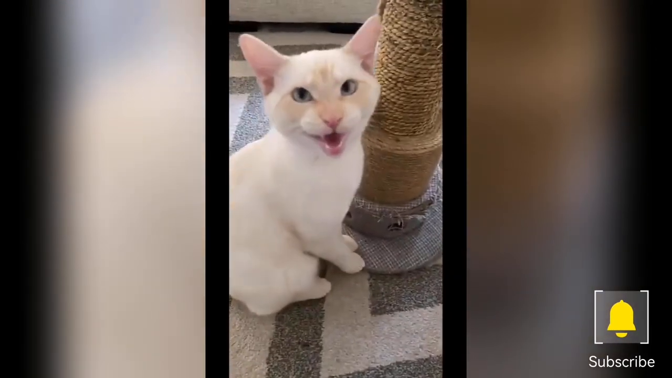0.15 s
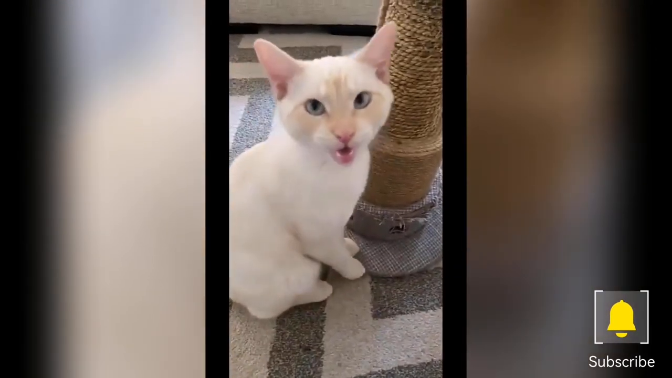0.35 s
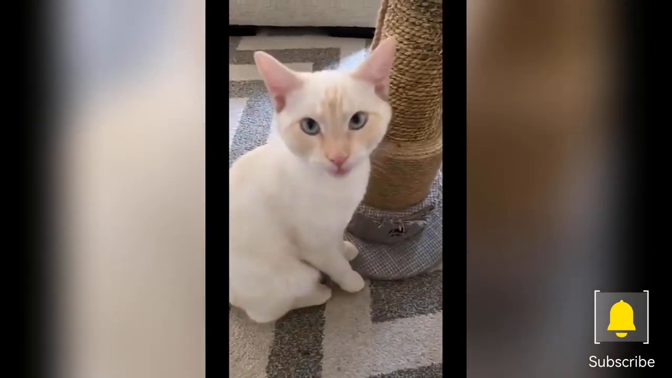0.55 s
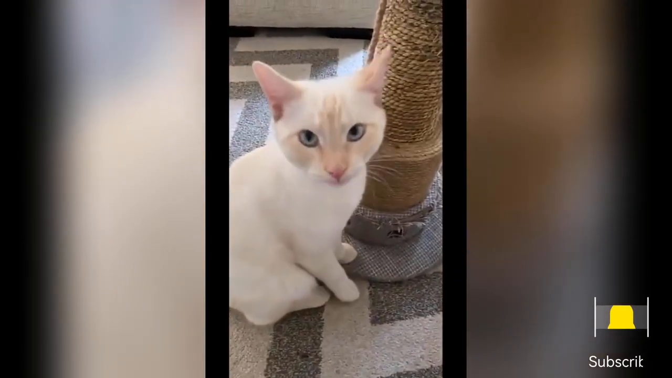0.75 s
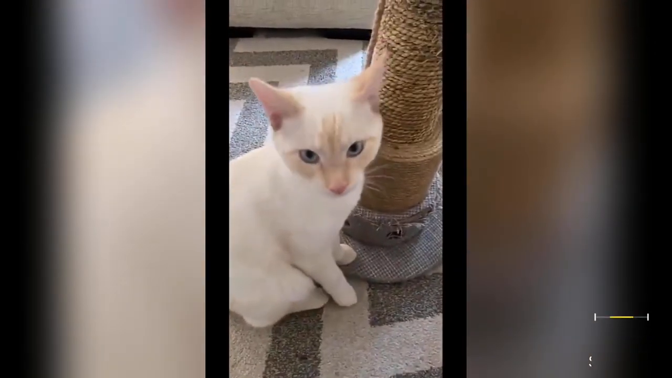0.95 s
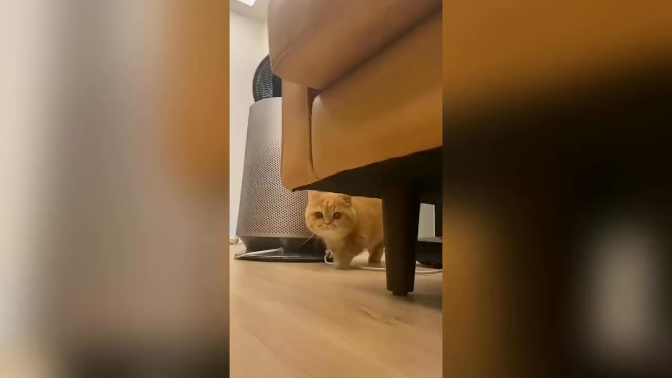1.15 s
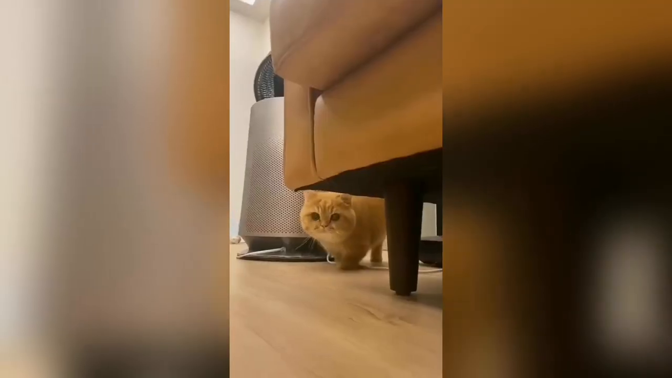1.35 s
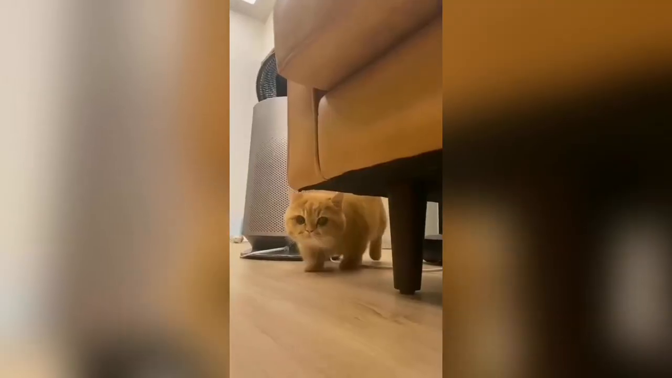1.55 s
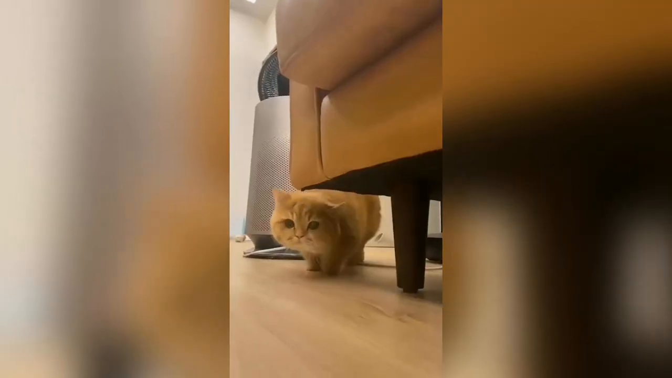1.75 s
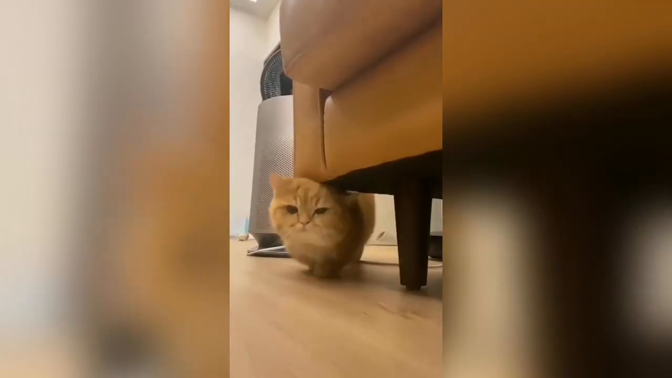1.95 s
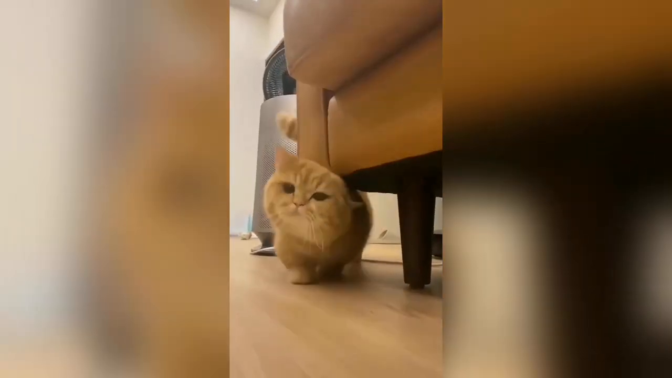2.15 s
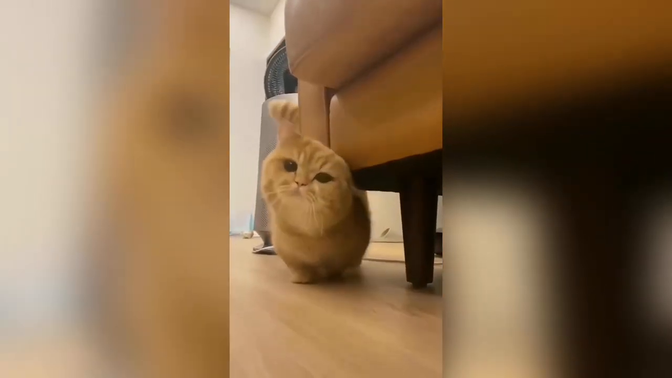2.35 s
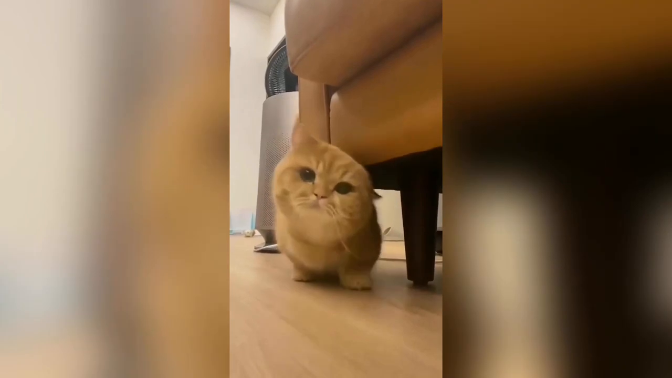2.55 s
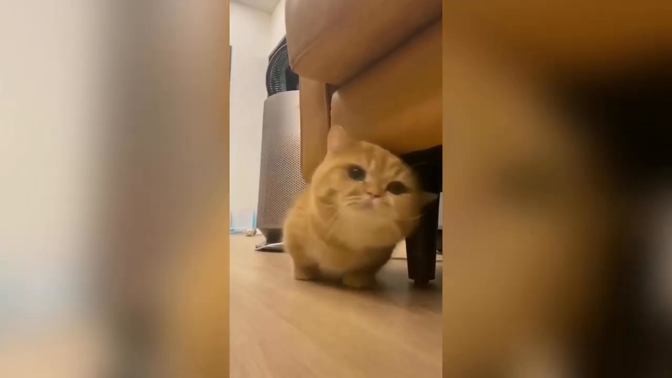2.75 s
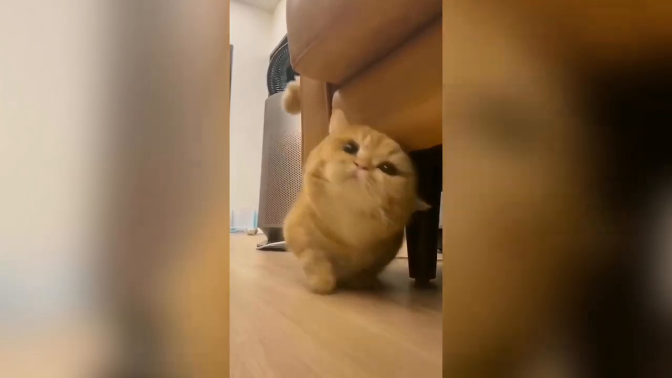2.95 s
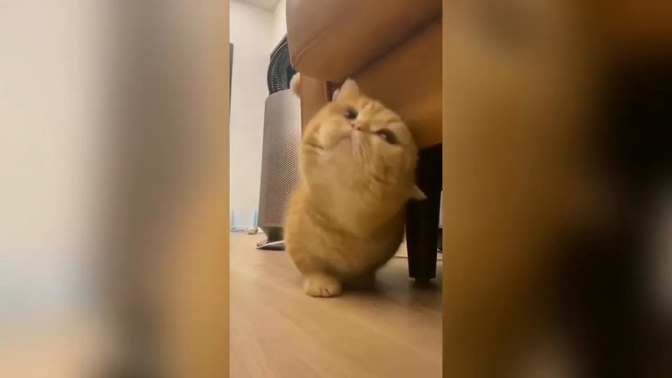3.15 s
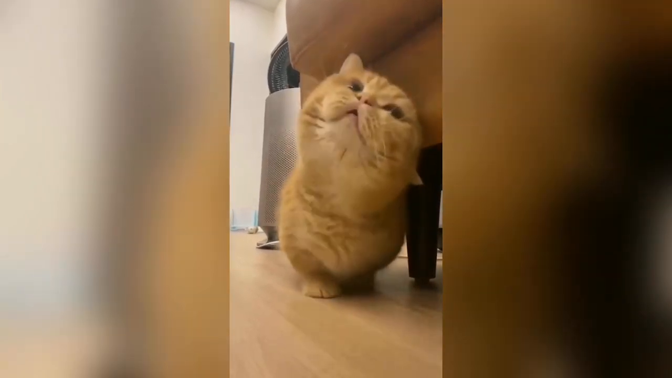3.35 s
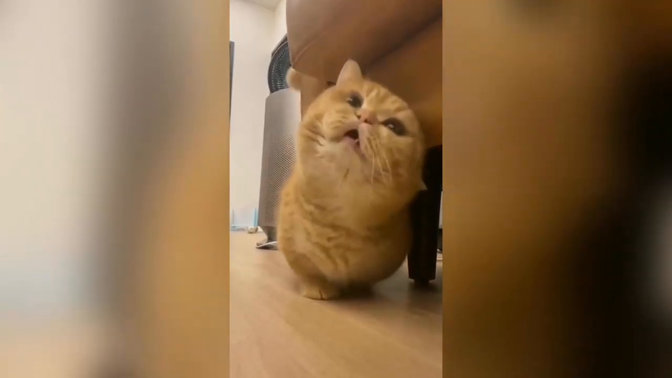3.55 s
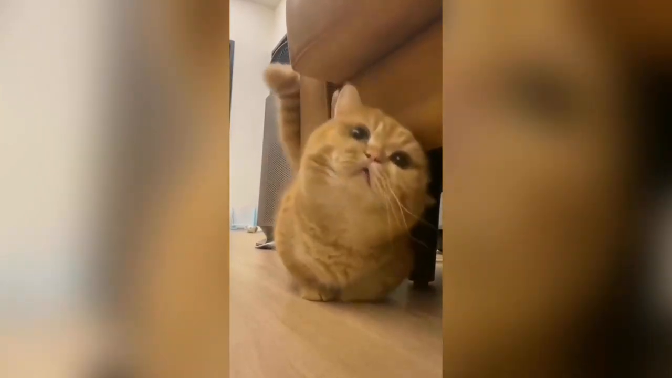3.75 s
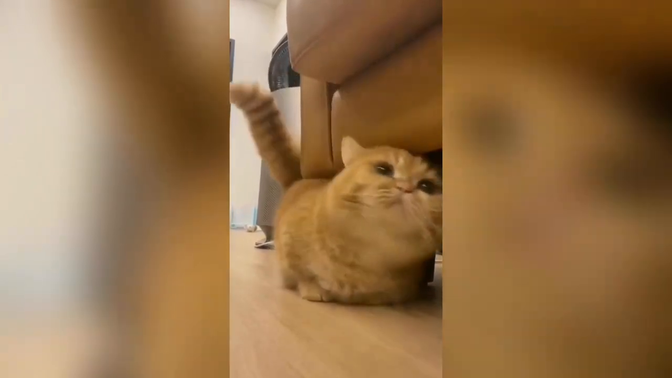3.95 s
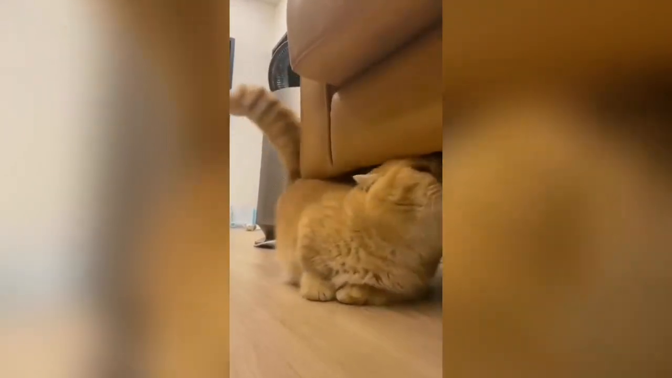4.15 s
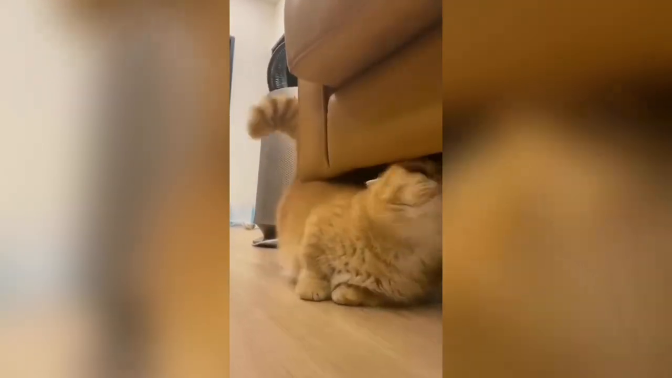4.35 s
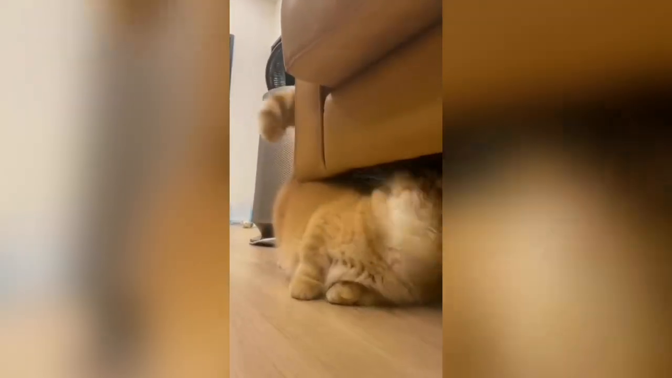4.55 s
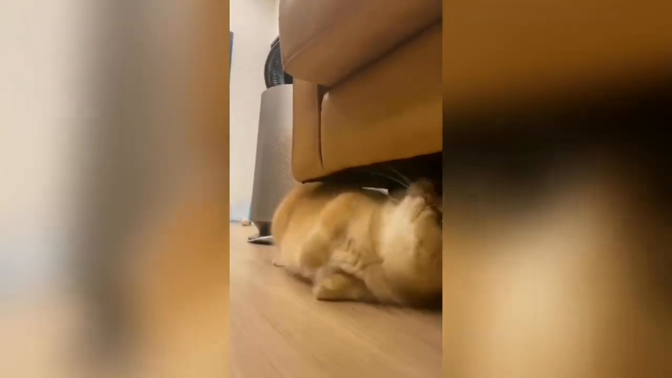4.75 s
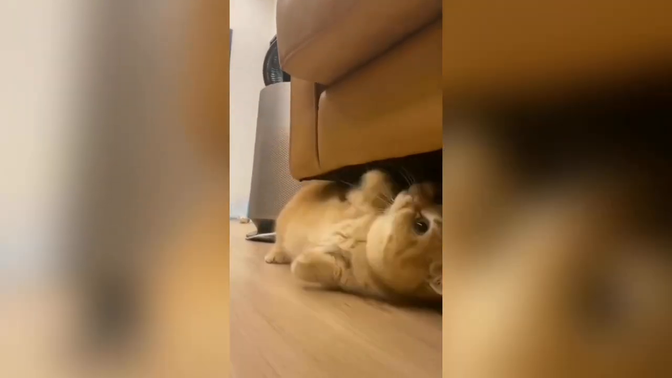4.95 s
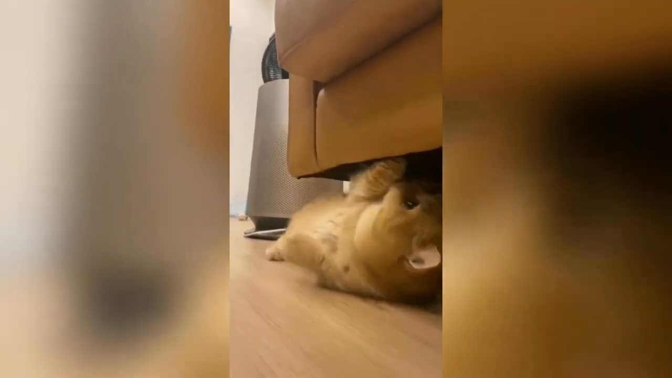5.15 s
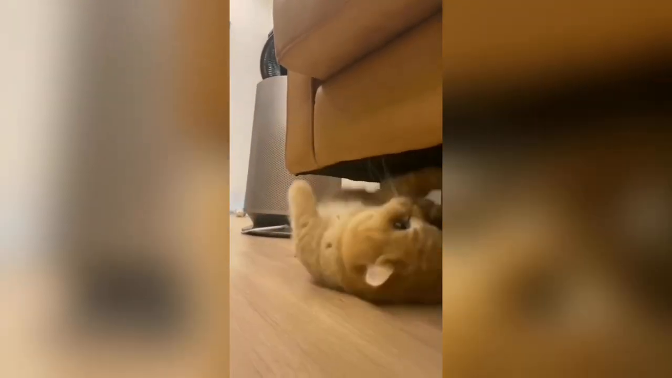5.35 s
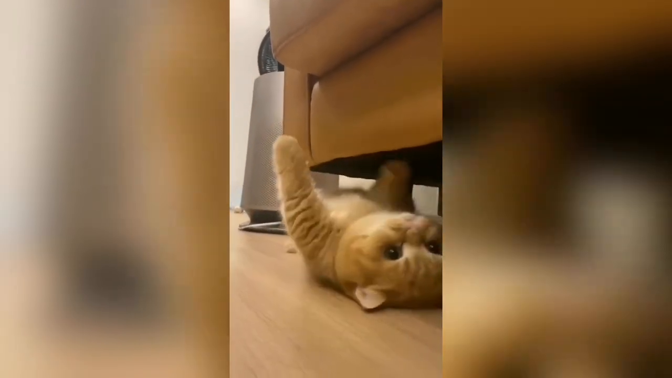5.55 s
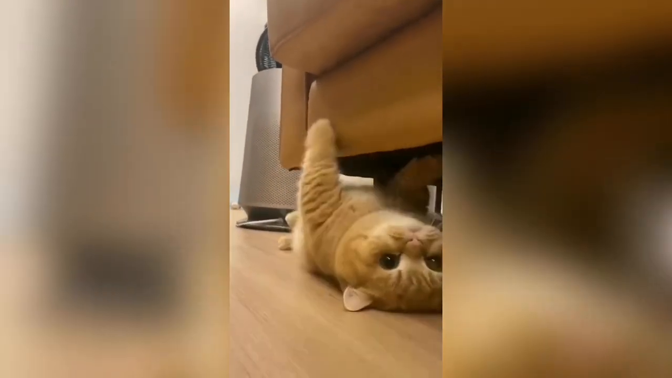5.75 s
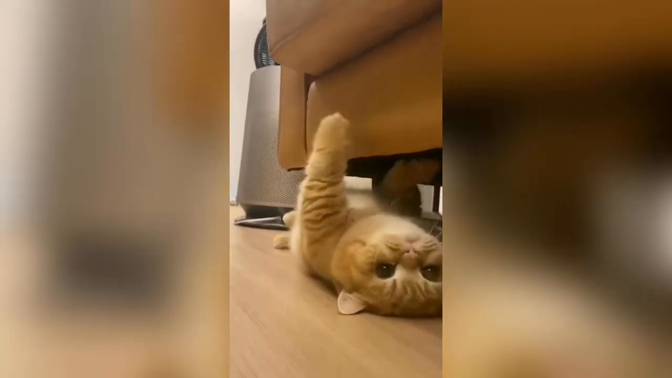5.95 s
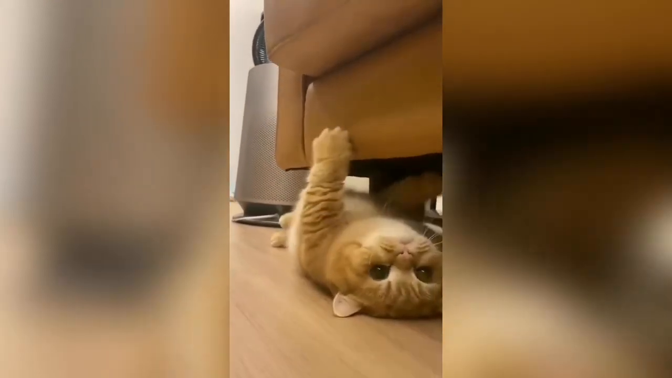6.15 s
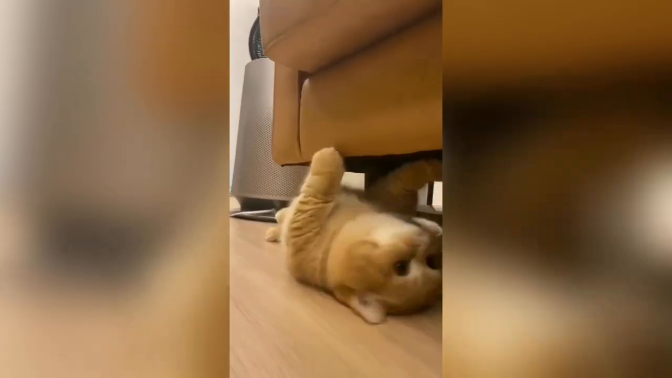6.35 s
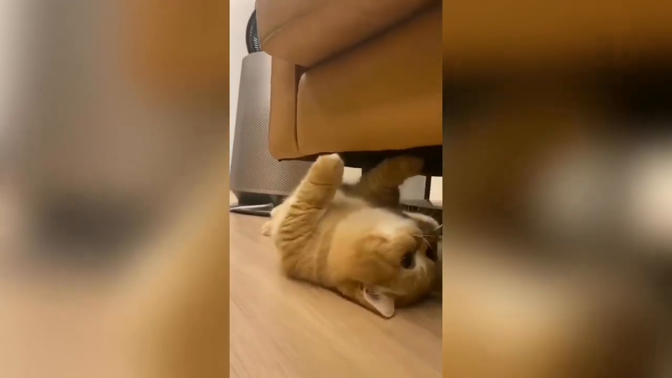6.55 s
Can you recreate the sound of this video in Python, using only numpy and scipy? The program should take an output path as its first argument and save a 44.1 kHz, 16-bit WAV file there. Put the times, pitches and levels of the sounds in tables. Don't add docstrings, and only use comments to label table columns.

```python
import sys
import numpy as np
from scipy import signal
from scipy.fft import rfft, irfft
from scipy.io import wavfile
from scipy.ndimage import uniform_filter1d

SR = 44100
rng = np.random.default_rng(int(sys.argv[2]) if len(sys.argv) > 2 else 0)


def output_pcm(signal):
    pcm = np.clip(np.atleast_2d(signal).T, -1, 1) * 32767
    wavfile.write(sys.argv[1], SR, np.round(pcm).astype(np.int16))


def gain_from_db(level_db):
    decades = np.asarray(level_db, float) / 20
    return 10 ** decades


N = 291060
T = np.arange(N) / SR
TOP_HZ = 13150
CUT_START_S, CUT_END_S = 1.207, 1.46

# f/Hz, density/dB per Hz
AIR_1_SPECTRUM = [(15, -37), (25, -25), (59, 3.5), (90, -19), (123, -2), (214, -31.5), (293, -15),
                  (380, -37), (411, -16.5), (534, -42), (1370, -44.5), (1830, -54.5), (13000, -58.5)]
AIR_2_SPECTRUM = [(15, -48), (25, -24), (37, -3.5), (64, 0.5), (120, -4), (148, -5), (173, -10.5),
                  (333, -10), (494, -24), (641, -22), (712, -24), (1110, -41.5), (4810, -56.5),
                  (7500, -53.5), (13000, -62)]
# f/Hz, width/Hz, level/dB
FAN_TONES = [
    (74, 15, -54.5),
    (110.6, 10, -58.5),
    (139.6, 5.6, -59.5),
]
# t/s, length/s, low swish/dB, high swish/dB re low, crisp top/dB re low
FUR_STROKES = [(1.505, 0.13, -98, -17, -16), (1.806, 0.13, -102, -13, -33), (2.156, 0.11, -80.5, -1, -27),
               (2.297, .12, -81.5, -3.5, -4.5), (2.402, 0.14, -75.5, -4, -27), (2.814, 0.055, -87, -2, -40),
               (3.083, 0.29, -75, -6, -8), (3.44, 0.6, -74.5, -3.5, -14), (3.977, 0.27, -68, -8, -13.5),
               (4.294, 0.44, -86, 11.5, -14), (4.7, 0.077, -92, 5, -3), (4.93, 0.12, -80, -3, 3),
               (5.073, 0.092, -71, -5, 0.5), (5.262, .12, -72, -5.5, -40), (5.389, .13, -60.5, -2.5, 1.5),
               (5.703, 0.14, -66, -2.5, -39), (5.789, 0.034, -86, 6, -32), (5.996, 0.11, -83, 10, -24),
               (6.055, 0.11, -61, -5.5, -21.5), (6.15, 0.28, -81, 4.5, -26), (6.393, 0.117, -60, -12, -35),
               (6.484, .3, -60.5, -38, -52)]
# low edge/Hz, high edge/Hz
TAP_BANDS_HZ = [
    (200, 800),
    (600, 2430),
    (2200, 4940),
    (6500, 8600),
]
# t/s, peak level/dB, thud/dB, body/dB
CLAW_TAPS = [
    (1.078, -67, 8, -16),
    (4.723, -60.5, -17, -14),
    (4.934, -66, -14, -3),
    (5.092, -64, 4, -2),
    (5.205, -57, -11, -1),
    (5.397, -41, -14, -5),
    (5.42, -50.5, 12, -1),
    (5.5, -50.5, -3, -2),
]
# t/s, peak level/dB, thud/dB, body/dB
PAD_TAPS = [(2.096, -76, 16, -18), (3.338, -68, 8.5, -8), (4.578, -68, 2, -13), (5.016, -67, 10, -10),
            (5.719, -70, 29.5, -5), (5.739, -58, 24.5, 2), (5.764, -54.5, 14, -11), (5.788, -57.5, 17.5, 3),
            (5.821, -61, 11, -13), (6.03, -52.5, 10.5, -4), (6.056, -39.5, 10, 9), (6.086, -50, 10, -12),
            (6.191, -57, 19.5, -13), (6.411, -41.5, 7, 5), (6.428, -43, -12, -2), (6.54, -55, -13, -12)]
# t/s, pitch/Hz, level/dB
MEW_TRACK = [
    (3.55, 847, -67.5),
    (3.589, 857, -45.5),
    (3.665, 976, -37.5),
    (3.731, 1107, -40.5),
    (3.78, 1139, -37.5),
    (3.851, 1159, -40),
    (3.909, 1132, -40.5),
    (3.991, 1020, -37.5),
    (4.066, 891, -48.5),
]
# t/s, pitch/Hz, level/dB, mouth resonance/Hz
MEOW_TRACK = [
    (0.0, 1111, -41, 2190),
    (0.05, 1055, -42, 2130),
    (0.064, 810, -46, 2400),
    (0.084, 896, -45.5, 2496),
    (0.2, 855.4, -42.5, 2346),
    (0.3, 817, -43, 2174),
    (0.42, 770, -47.5, 1782),
    (0.65, 741.5, -48, 1706),
    (0.715, 704, -53.5, 1163),
]
# t/s, pitch/Hz, level/dB, mouth resonance/Hz
CATCH_TRACK = [
    (0.791, 705, -63, 1350),
    (0.806, 812, -54.5, 1163),
    (0.86, 867.5, -92, 2650),
]
# f/Hz, level/dB
MEW_UPPER_COLOUR = [(3400, 16), (4500, -5.5), (5700, -3.5), (6900, -14), (7500, -49.5), (9500, -31.5),
                    (12500, -38)]
MEOW_UPPER_COLOUR = [(2700, -18), (3400, -12), (4300, -11.5), (5300, -13), (6300, 4.5), (6950, 4.5),
                     (7300, -24), (7800, -9.5), (8800, -16), (9800, -19), (10500, -32), (11500, -27),
                     (13000, -27)]
# f/Hz, level/dB
MEW_SIDE_COLOUR = [(60, -36.5), (110, -36), (200, -19.5), (360, -12), (650, -4), (1170, -21.5), (2120, -15),
                   (3840, -16.5), (6970, 11.5), (12600, -3)]
MEOW_SIDE_COLOUR = [(600, -10.5), (1200, -12), (2400, -11.5), (3000, 10.5), (4600, 7), (5600, -0.5),
                    (7000, -13), (12000, -11)]
# f/Hz, level/dB
AUDIBLE_FLOOR = [(900, -125), (3000, -112), (6000, -106), (6800, -98), (9300, -98), (9900, -115),
                 (13000, -115)]
# f/Hz, level/dB
MASKING_DEPTH = [(700, -39), (1900, -37.5), (3500, -28), (6900, -30.5), (7300, -12.5), (7800, -29),
                 (9600, -26.5), (10300, -12), (11300, -19), (13000, -23.5)]


def colour(points, hz):
    f, db = np.transpose(points)
    return np.interp(np.log(np.maximum(hz, 1)), np.log(f), db)


def band(lo_hz, hi_hz, channels=1, order=2):
    sos = signal.butter(order, [lo_hz, min(hi_hz, .45 * SR)], "band", fs=SR, output="sos")
    x = signal.sosfilt(sos, rng.standard_normal((channels, N)))
    return x / x.std()


def walk(rate_hz):
    hold = max(int(SR / rate_hz), 1)
    x = np.repeat(rng.standard_normal(N // hold + 1), hold)
    x = uniform_filter1d(uniform_filter1d(x, hold), hold)[:N]
    return x / x.std()


def air(points, level_db, alike_hz, swell_db, flicker_db):
    out, swell = 0, walk(1.4)
    for hz in 28 * 2 ** np.arange(0, 9.1, .5):
        mid, side = band(hz * 2 ** -.25, hz * 2 ** .25, channels=2)
        db = colour(points, hz) + 10 * np.log10(hz)
        db = db + swell_db * swell + flicker_db * min(hz / 400, 1) * walk(9)
        width = min((hz / alike_hz) ** 1.5, 1)
        out = out + gain_from_db(db) * (mid + width * side * np.array([[1], [-1]]))
    return out * gain_from_db(level_db) / out.std()


def fan():
    return sum(gain_from_db(db) * band(hz - width / 2, hz + width / 2)[0] for hz, width, db in FAN_TONES)


def fur(grain_db, patch_db, wide, top_db):
    press_share, fade_db = .2, 15
    s, length, db, high_db, crisp_db = np.transpose(FUR_STROKES)[:, :, None]
    along = (T[::64] - s) / length
    stroke = np.clip(along / press_share, 0, 1) * gain_from_db(-fade_db * np.clip(along - press_share, 0, 9))

    def strength(rel_db, rest_db):
        coarse = (stroke * gain_from_db(db + rel_db)).sum(axis=0) + gain_from_db(rest_db)
        return np.repeat(coarse, 64)[:N]

    low, high, crisp = strength(0, -92), strength(high_db, -97), strength(crisp_db, -115)
    top = np.maximum(high * gain_from_db(-4.0), crisp) * gain_from_db(top_db)
    edges_hz = (1000, 2660), (2800, 5540), (6800, 8800), (9600, 12000)
    out = 0
    for edge, gain in zip(edges_hz, (low, high, crisp, top)):
        noise = band(*edge, channels=3, order=4)
        out = out + gain * gain_from_db(patch_db * walk(30)) * (noise[0] + wide * noise[1:])
    return gain_from_db(grain_db * walk(150) - 5.0) * out


def taps(cycles, crack_db, tail_db, wide):
    # crisp dB, tail s, left minus right dB
    claw_kind, pad_kind = (-3, .14, 2), (-28, 0.16, -0.17)
    blows = [(*row, *claw_kind) for row in CLAW_TAPS] + [(*row, *pad_kind) for row in PAD_TAPS]
    bands = [band(*edge, channels=3, order=4) for edge in TAP_BANDS_HZ]
    out, grain = np.zeros((2, N)), gain_from_db(2 * walk(200))
    place = rng.uniform(0.2, .6, (len(blows), 4))
    for (s, db, thud_db, body_db, crisp_db, tail_s, pan_db), where in zip(blows, place):
        i = slice(int(s * SR), min(int((s + .5) * SR), N))
        t = T[i] - T[i][0]
        decay = 1000 ** (-t / max(tail_s, .01))
        tail = gain_from_db(tail_db) * decay * (1 - np.exp(-t / 0.0016)) * grain[i]
        pan = np.array([[pan_db], [-pan_db]]) / 2
        levels_db = thud_db, body_db, -4, crisp_db
        for noise, (lo, hi), at, rel_db in zip(bands, TAP_BANDS_HZ, where, levels_db):
            turns = lo * (hi / lo) ** at * t
            ring = np.exp(-turns / cycles) * (1 - np.exp(-turns / 0.185))
            crack = gain_from_db(crack_db) * ring * np.sin(2 * np.pi * turns)
            hiss = tail * (noise[0, i] + wide * noise[1:, i])
            out[:, i] += gain_from_db(db + rel_db + pan) * (crack + hiss)
    return out


def mouth(hz, mouth_hz, sharp, steep):
    leak_db = -1.5
    r = hz / mouth_hz
    return np.maximum(-10 * steep * np.log10((1 - r ** 2) ** 2 + (r / sharp) ** 2), leak_db)


def voice(s, hz, db, mouth_hz, sharp, steep, tilt_db, upper_db, hoarse, throat, jitter, flutter_hz,
          halves, shimmer_db, breath_db, smear, twist):
    uneven_db, wander, scatter = 1.1, .09, 14
    gape_db_per_khz, gape_top_hz = 4.5, 5000
    rough = np.maximum(hoarse - .1, 0)
    on = np.clip(np.minimum(T - s[0] + (s[0] < .01), s[-1] - T) / 0.005, 0, 1)
    stagger = jitter * hoarse * walk(flutter_hz) + wander * rough * walk(70)
    phase = 2 * np.pi * np.cumsum(hz * (1 + stagger)) / SR
    flutter = 1 + .6 * hoarse * walk(3 * flutter_hz)
    flutter += halves * rough * walk(80) * np.cos(phase / 2)

    low = 0
    for k in range(1, 4):
        part_db = db + tilt_db * np.log2(k) + mouth(k * hz, mouth_hz, sharp, steep)
        part_db = part_db + uneven_db * (k - 1) * walk(35)
        low = low + gain_from_db(part_db) * np.cos(k * phase + twist * k * k)

    upper, power = 0, 0
    for k in range(4, 18):
        gape_db = gape_db_per_khz * (mouth_hz / 1000 - 2) * np.clip((gape_top_hz - k * hz) / 500, 0, 1)
        gain = gain_from_db(colour(throat, k * hz) + gape_db + shimmer_db * walk(40)) * (k * hz < TOP_HZ)
        blur = smear * np.clip(k * hz / 7000 - .6, 0, 1) + scatter * rough
        upper = upper + gain * np.cos(k * phase + twist * k * k + blur * walk(250))
        power = power + gain ** 2
    total = uniform_filter1d(np.sqrt(power), size=3000)

    hiss = band(5200, 7100, order=4) + gain_from_db(-6) * band(7600, 9000, order=4)
    hiss = (hiss + gain_from_db(-19) * band(12000, 17000, order=4))[0]
    breath = gain_from_db(breath_db) * hoarse * (1 + np.sin(phase)) * hiss
    tone = np.sqrt(2) * flutter * (low + gain_from_db(upper_db) * upper / total)
    return on * (tone + gain_from_db(upper_db) * breath)


def mew():
    fade_s, fade_db, jaw_lead_s = 0.029, -37, .004
    open_hz, shut_db_per_hz = 1075, 0.32
    s, hz, db = np.transpose(MEW_TRACK)
    hz = np.interp(T, s, hz)
    s, db = np.append(s, s[-1] + fade_s), np.append(db, db[-1] + fade_db)
    db = np.interp(T, s, db)
    shut_db = -shut_db_per_hz * np.maximum(open_hz - np.interp(T + jaw_lead_s, T, hz), 0)
    return voice(s, uniform_filter1d(hz, size=900), db, mouth_hz=2605, sharp=2.2, steep=1.22,
                 tilt_db=-7.5 + shut_db, upper_db=db - 23 + 1.2 * shut_db, hoarse=.012,
                 throat=MEW_UPPER_COLOUR, jitter=.15, flutter_hz=91.4, halves=0, shimmer_db=4,
                 breath_db=-10, smear=.15, twist=0)


def meow():
    clear, broken, settled = .025, .25, .085
    break_relock_s = .03, .045, .11, .17
    catch_s, catch_rise_s = .76, .075
    s, *columns = np.vstack([MEOW_TRACK, CATCH_TRACK]).T
    hz, db, mouth_hz = (np.interp(T, s, c) for c in columns)
    hoarse = np.interp(T, break_relock_s, (clear, broken, broken, settled))
    hoarse = hoarse + .6 * np.clip((T - catch_s) / catch_rise_s, 0, 1) ** 3
    upper_db = np.maximum(-44.5 + 0.82 * (db + 45.5), db)
    return voice(s, hz, db, mouth_hz, sharp=6, steep=1.29, tilt_db=-4.5, upper_db=upper_db,
                 hoarse=hoarse, throat=MEOW_UPPER_COLOUR, jitter=.06, flutter_hz=250, halves=1.0,
                 shimmer_db=5.0, breath_db=1.5, smear=1.6, twist=1.4)


def ports(x, side, pan_db, wet_db, t60_s, dull_hz):
    s = np.arange(int(.5 * SR)) / SR
    tail = rng.standard_normal((2, len(s))) * 1000 ** (-s / t60_s) * (s > .003)
    tail = signal.sosfilt(signal.butter(1, dull_hz, fs=SR, output="sos"), tail)
    tail *= gain_from_db(wet_db) / np.sqrt(np.sum(tail ** 2, axis=1, keepdims=True))
    side_gain = gain_from_db(colour(side, np.arange(N // 2 + 1) * SR / N))
    turned = irfft(-1j * rfft(x) * side_gain, N)
    direct = np.array([(x + turned) * gain_from_db(pan_db / 2), (x - turned) * gain_from_db(-pan_db / 2)])
    return direct + signal.fftconvolve(x[None], tail, axes=1)[:, :N]


def narrow(x, top_hz):
    side = x[0] - x[1]
    low_side = signal.sosfiltfilt(signal.butter(6, top_hz, fs=SR, output="sos"), side)
    side = low_side * .3 + side * .2
    return x.mean(axis=0) + np.array([side, -side])


def drop_masked(x, reach_hz, chance_db):
    mid_side = np.array([x[0] + x[1], x[0] - x[1]]) / 2
    hz, _, z = signal.stft(mid_side, SR, nperseg=2048, noverlap=1536)
    z = z[:, :1024]
    power = (np.abs(z) ** 2).reshape(2, 64, 16, -1).sum(axis=2)
    centre = hz[8:1024:16]
    distance_hz = np.abs(centre[:, None] - centre)
    spread = gain_from_db(colour(MASKING_DEPTH, centre)[:, None] - 20 * distance_hz / reach_hz) ** 2
    luck = uniform_filter1d(rng.standard_normal(power.shape[1:]), size=4)
    luck = uniform_filter1d(luck, size=3, axis=0) * 3.4
    least = gain_from_db(colour(AUDIBLE_FLOOR, centre))[:, None] ** 2 + spread @ power.sum(axis=0)
    least = least * gain_from_db(chance_db * luck) ** 2
    keep = (uniform_filter1d(power, size=4) > least) | (centre[:, None] < 700)
    z = np.pad(z * np.repeat(keep, 16, axis=1), ((0, 0), (0, 1), (0, 0)))
    mid, side = signal.istft(z, SR, nperseg=2048, noverlap=1536)[1][:, :N]
    return np.array([mid + side, mid - side])


def scene():
    second = air(AIR_2_SPECTRUM, -51.0, alike_hz=880, swell_db=.5, flicker_db=0.43) + fan()
    second += fur(grain_db=2.3, patch_db=2, wide=0.97, top_db=-5.0)
    second += ports(mew(), MEW_SIDE_COLOUR, pan_db=-1.3, wet_db=-19.5, t60_s=0.31, dull_hz=5000)
    first = air(AIR_1_SPECTRUM, -50.5, alike_hz=800, swell_db=1, flicker_db=1.5)
    first += ports(meow(), MEOW_SIDE_COLOUR, pan_db=1.07, wet_db=-18.5, t60_s=.3, dull_hz=7000)
    paws = taps(cycles=1.44, crack_db=0.5, tail_db=-15, wide=0.76)
    in_first = T < (CUT_START_S + CUT_END_S) / 2
    return np.where(in_first, narrow(first, top_hz=7000), second) + paws


def band_limit(x):
    return signal.sosfilt(signal.butter(12, 13220, fs=SR, output="sos"), x)


def record(dry):
    x = signal.sosfilt(signal.butter(4, 44, "high", fs=SR, output="sos"), dry)
    x = signal.sosfilt(signal.ellip(8, .2, 70, TOP_HZ, fs=SR, output="sos"), x)
    x = drop_masked(x, reach_hz=2590, chance_db=3.5)
    fade_out, fade_in = (CUT_START_S - T) / 0.001895, (T - CUT_END_S) / 0.0015
    mix = x * np.clip(np.maximum(fade_out, fade_in), 0, 1)
    return band_limit(mix)


dry = scene()
out = record(dry)
output_pcm(out)
```